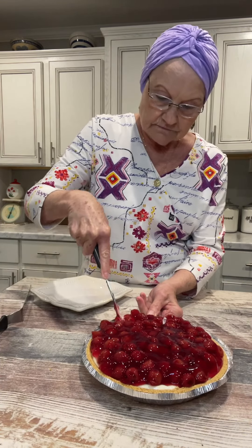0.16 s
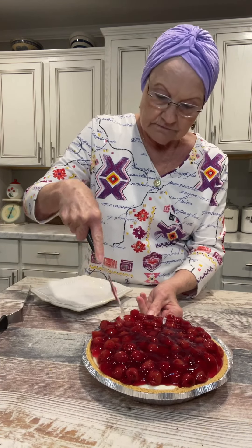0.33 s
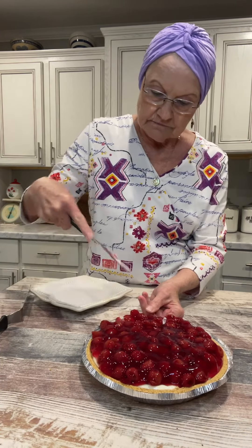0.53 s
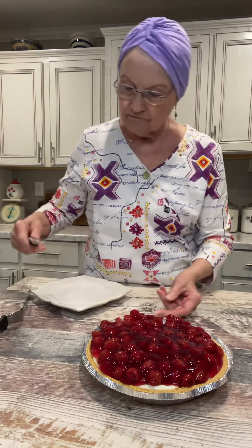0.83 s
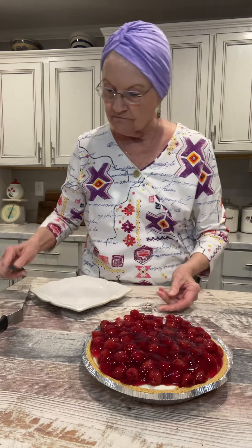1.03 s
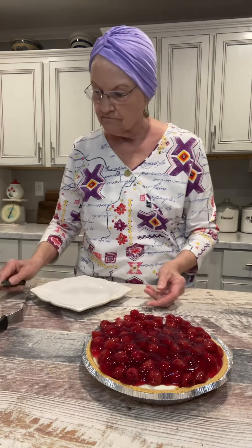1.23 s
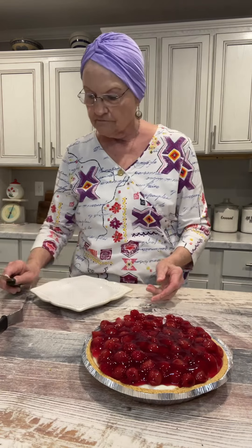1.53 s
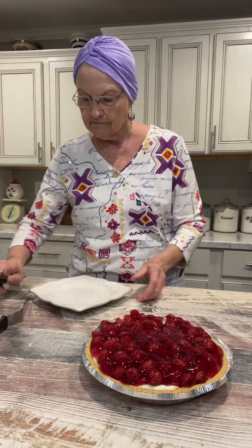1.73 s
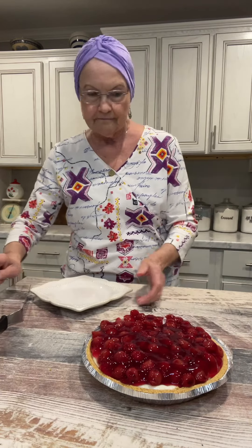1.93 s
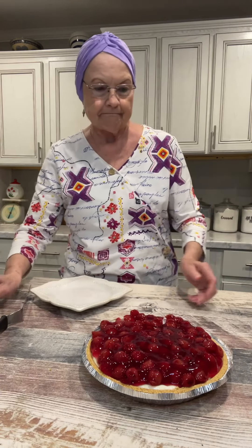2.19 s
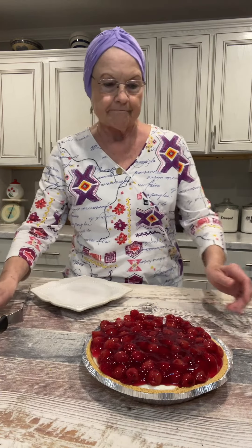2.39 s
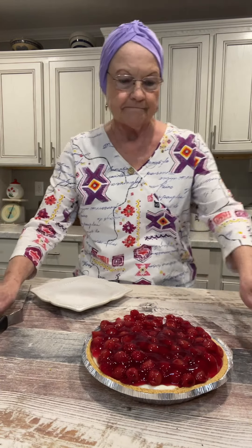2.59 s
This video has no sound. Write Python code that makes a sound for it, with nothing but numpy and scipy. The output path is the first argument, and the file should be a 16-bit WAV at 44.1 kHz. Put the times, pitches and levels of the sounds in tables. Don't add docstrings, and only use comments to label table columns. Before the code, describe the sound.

Dish dragged and set down hard on a worktop, preceded by small metallic knife taps

```python
import sys
import numpy as np
from scipy import signal
from scipy.fft import rfft, irfft
from scipy.io import wavfile
from scipy.ndimage import uniform_filter1d

SR = 44100
rng = np.random.default_rng(int(sys.argv[2]) if len(sys.argv) > 2 else 0)


def makeup_ratio(level_db):
    decades = np.asarray(level_db, float) / 20
    return 10 ** decades


def bounce(signal):
    frames = np.transpose(np.atleast_2d(signal))
    limited = np.clip(frames, -1, 1)
    pcm = np.round(limited * 32767).astype(np.int16)
    wavfile.write(sys.argv[1], SR, pcm)


N = 121275
T = np.arange(N) / SR


def table(rows, at, log=False):
    r = np.array(rows, float)
    if log:
        return np.interp(np.log(at), np.log(r[:, 0]), r[:, 1])
    return np.interp(at, r[:, 0], r[:, 1], -130, -130)


def unit(x):
    return x / np.sqrt(np.mean(x ** 2))


def colour(x, tone):
    hz = np.maximum(np.arange(4097) * SR / 8192, 1)
    cep = irfft(np.log(makeup_ratio(table(tone, hz, log=True))))
    cep[1:4096] *= 2
    cep[4097:] = 0
    return signal.fftconvolve(x, irfft(np.exp(rfft(cep))))[:len(x)]


def ring(x, hz, t60_s):
    pole = np.exp(2j * np.pi * hz / SR - np.log(1000) / (max(t60_s, .002) * SR))
    return signal.lfilter([1], [1, -pole], x).imag


def ping(at_s, hz, t60_s):
    return ring(1. * (np.arange(N) == int(at_s * SR)), hz, t60_s)


def walk(rate_hz):
    k = int(SR / rate_hz)
    return unit(uniform_filter1d(uniform_filter1d(rng.standard_normal(N), k), k))


def grit(rate_hz, scatter_db):
    chance, sign, size = rng.random((3, N))
    slips = (chance < rate_hz / SR) * np.sign(sign - .5)
    return unit(slips * makeup_ratio(-scatter_db * np.log(size + .02)))


def hits(rows, modes, crack, crack_db, crack_s, split=.02):
    out, t = np.zeros(N), T[:SR // 4]
    impulse = 1. * (t == 0)
    for s, db, top_hz in rows:
        snap = colour(rng.standard_normal(len(t)) * np.exp(-t / crack_s), crack)
        body = np.zeros(len(t))
        for k, (hz, gain_db, t60_s) in enumerate(modes):
            level, detune = rng.standard_normal(2)
            if hz >= 300:
                t60_s = min(t60_s, .07)
            for side in (-1, 1):
                mode = ring(impulse, hz * (1 + side * split * detune), t60_s)
                body += (-1) ** k * makeup_ratio(gain_db + 2 * level) * mode
        hit = body / abs(body).max() + makeup_ratio(crack_db) * snap / abs(snap).max()
        soft = signal.butter(2, min(top_hz, SR / 2.2), fs=SR, output="sos")
        hit = signal.sosfilt(soft, hit)
        i = int(s * SR)
        out[i:i + len(t)] += makeup_ratio(db) * hit[:N - i]
    return out


def bend(x, delay_1khz_s):
    khz = np.fft.rfftfreq(N, 1000 / SR)
    phase = 4 * np.pi * 1000 * delay_1khz_s * (np.sqrt(khz + .02) - khz / 8)
    return irfft(rfft(x) * np.exp(-1j * phase), N)


# (frequency [Hz], t60 [s])
ROOM_T60 = [(100, 0.57), (400, 0.33), (1500, 0.47), (4000, 0.4), (8000, 0.32), (15000, 0.31)]


def room(x, wet_db):
    t, tail = T[:SR // 2], 0
    for hz in 60 * 2 ** np.arange(0, 8.2, .5):
        edges_hz = [hz / 2 ** .25, hz * 2 ** .25]
        sos = signal.butter(2, edges_hz, "band", fs=SR, output="sos")
        band = signal.sosfilt(sos, rng.standard_normal(len(t)))
        tail = tail + band * makeup_ratio(-60 * t / table(ROOM_T60, hz, log=True))
    build_up_s = 0.001
    tail = tail * (1 - np.exp(-t / build_up_s))
    return x + makeup_ratio(wet_db) * signal.fftconvolve(x, tail / np.sqrt(np.sum(tail ** 2)))[:N]


# (frequency [Hz], level [dB])
KITCHEN_TONE = [(15, -19), (25, -10), (64, 0), (236, -9.5), (354, -6), (384, -20), (416, -10), (1400, -28),
                (16000, -38.5)]
# (frequency [Hz], level [dB])
FRIDGE_LINES = [(59.5, -60), (119, -89), (178, -76), (416, -73), (712, -80), (1122, -79)]
# (time [s], level [dB])
WHINE = [(0, -62), (.15, -62), (1.1, -63), (1.3, -74.5), (1.9, -64), (2.75, -87)]


def fridge():
    kitchen_db, whine_hz = -58, 354
    hiss = unit(colour(rng.standard_normal(N), KITCHEN_TONE))
    out = hiss * makeup_ratio(kitchen_db - 2.0 + 2.9 * walk(9.4))
    for hz, db in list(FRIDGE_LINES) + [(whine_hz, table(WHINE, T))]:
        cycles = hz * T + rng.random() + 0.039 * walk(1.2)
        out += makeup_ratio(db + 1.5 + 3.0 * walk(4.0)) * np.sin(2 * np.pi * cycles)
    return out


# (time [s], level [dB])
RUSTLE = [(0, -73.5), (.04, -64.5), (.13, -65), (.25, -73.5), (.4, -71.5), (.425, -65.5), (.56, -63.5),
          (.65, -71), (.85, -65), (.98, -67.5), (1.4, -74), (1.63, -71), (1.66, -67.5), (1.8, -70.5),
          (2.0, -73), (2.66, -67.5), (2.7, -65.5), (2.75, -59)]
# (frequency [Hz], level [dB])
RUSTLE_TONE = [(300, -12.5), (700, -2), (1500, -3.5), (3300, -7), (6000, -12.5), (15000, -21)]


def rustle():
    return unit(colour(grit(6000, 2.5), RUSTLE_TONE)) * makeup_ratio(table(RUSTLE, T) + walk(30))


# (time [s], level [dB], frequency [Hz], t60 [s])
THUMPS = [
    (1.018, -45.5, 150, 0.067),
    (1.076, -60, 150, 0.28),
    (1.129, -66, 145, 0.075),
    (1.569, -49, 95, 0.11),
    (1.665, -55, 480, 0.068),
    (1.7, -50, 300, 0.09),
    (1.721, -61, 1160, .05),
]


def wrist_thumps():
    return sum(makeup_ratio(db) * ping(s, hz, t60_s) for s, db, hz, t60_s in THUMPS)


# (time [s], peak [dB], centre [Hz])
TICKS = [
    (0.064, -43.5, 9900),
    (0.0646, -50, 5000),
    (0.162, -49, 13100),
    (0.166, -42, 12800),
    (.170, -44, 14000),
    (0.174, -51, 11800),
    (0.2254, -48, 5500),
    (.311, -62, 12000),
    (1.814, -51, 13100),
]


def sticky_ticks():
    return sum(makeup_ratio(db) * ping(s, hz, 3 / hz) for s, db, hz in TICKS)


# (time [s], peak [dB], brightest [Hz])
RIM_TAPS = [
    (.4234, -48.5, 3500),
    (.4446, -34.5, 15500),
    (.4456, -29.5, 11000),
    (.4525, -40.5, 6900),
    (.47, -55, 3900),
    (.53, -45.5, 6400),
]
# (frequency [Hz], level [dB], t60 [s])
PAN = [(1830, -8, .03), (2190, -4, 0.046), (2440, -2.5, 0.025), (3244, -3.5, 0.058), (3370, -8, 0.033),
       (6310, -9.5, 0.041), (7040, -2, 0.025), (8840, -17, 0.018)]
# (frequency [Hz], level [dB])
RIM_CRACK = [(500, -30), (1100, -7), (2240, -9), (3300, -4), (5100, -4), (7100, -6), (10000, -5.5),
             (14500, -7.5)]


def rim_clinks():
    return hits(RIM_TAPS, PAN, RIM_CRACK, crack_db=3.5, crack_s=0.0011, split=.04)


# (time [s], level [dB])
SLIDE = [(.985, -64), (1.005, -62), (1.022, -50), (1.1, -62.5), (1.13, -51), (1.19, -57.5), (1.215, -48.5),
         (1.26, -66), (1.34, -78)]
# (frequency [Hz], level [dB])
SLIDE_TONE = [(500, -39), (1000, 1), (2100, 0), (4000, -7.5), (10000, -15.5), (11500, -18), (16000, -24)]


def knife_slide():
    return unit(colour(grit(3000, 3), SLIDE_TONE)) * makeup_ratio(table(SLIDE, T) + walk(40))


# (time [s], peak [dB], brightest [Hz])
LAY_TAPS = [
    (1.0068, -44, 2100),
    (1.0211, -42, 22000),
    (1.1265, -44, 17000),
    (1.1318, -29.5, 13000),
    (1.1365, -28.5, 17000),
    (1.143, -29.5, 28000),
    (1.15, -40, 20000),
    (1.1605, -31, 2500),
    (1.177, -38.5, 15000),
    (1.2094, -36, 2500),
]
# (frequency [Hz], level [dB], t60 [s])
BLADE = [(1250, -4, 0.047), (2077, 9, 0.035), (2980, -3, 0.036), (4780, 0, 0.06), (5820, 7, 0.045),
         (7100, 2, 0.063), (8110, 2.5, 0.07), (9450, 1.5, 0.07), (10750, 1.5, 0.07), (12500, -9, .07),
         (13000, -4, 0.032), (14500, -1, .05)]
# (frequency [Hz], level [dB])
LAY_CRACK = [(600, -62), (1200, 3.5), (2100, -12), (3500, 4), (5840, 1), (10500, -4.5), (12500, -12),
             (16000, -12)]


def knife_laid():
    return hits(LAY_TAPS, BLADE, LAY_CRACK, crack_db=-5, crack_s=.004, split=.009)


# (time [s], peak [dB], brightest [Hz])
KNOCK = [
    (2.0659, -7, 5500),
    (2.0702, -13, 4000),
    (2.0742, -24, 3500),
    (2.0802, -21, 3500),
    (2.0845, -18, 2500),
    (2.366, -34, 5000),
]
# (frequency [Hz], level [dB], t60 [s])
DISH = [(186, -12.5, 0.038), (297, -6.5, 0.041), (540, 1, 0.022), (738, -18.5, 0.047), (989, -12.5, 0.039),
        (1287, -6, 0.014), (1410, -22, 0.03), (2090, -3.5, 0.015), (2970, -13, 0.018)]
# (frequency [Hz], level [dB])
KNOCK_CRACK = [(60, -44), (150, -24), (480, -7), (1400, 0), (2200, -6), (3400, -20), (8500, -34),
               (16000, -46)]


def dish_knock():
    return bend(hits(KNOCK, DISH, KNOCK_CRACK, crack_db=4, crack_s=.00004), delay_1khz_s=.0016)


def sing(slips, peaks):
    out = 0
    for k, (hz, width_hz, db) in enumerate(peaks):
        mode = unit(ring(slips, hz, 2.2 / max(width_hz, 110)))
        out = out + (-1) ** k * makeup_ratio(db) * mode * np.sqrt(width_hz)
    return unit(out)


# (time [s], level [dB])
DRAG = [(2.075, -46), (2.095, -35), (2.14, -35), (2.165, -32), (2.2, -29.5), (2.27, -33), (2.31, -38),
        (2.39, -47), (2.45, -58)]
# (frequency [Hz], width [Hz], level [dB])
DRAG_RING = [(275, 49, -16), (480, 120, -3.5), (640, 185, -1.5), (740, 34, -25), (990, 26, 1),
             (1260, 77, 4.5), (1660, 30, 0.5), (2130, 74, -18), (2656, 92, -7.5), (3010, 660, -18.5)]
# (frequency [Hz], level [dB])
DRAG_TONE = [(60, -38), (140, -19), (300, -6), (563, -0.5), (896, -10.5), (2040, -11.5), (3200, -25),
             (16000, -62.5)]
# (frequency [Hz], width [Hz], level [dB])
TILTED_RING = [(190, 44, -5), (290, 170, -6), (535, 290, -8.5), (746, 61, 1.5), (1100, 45, -1.5),
               (1750, 41, -22), (2170, 410, -14.5)]
# (time [s], extra level [dB])
JOLTS = [(2.107, -0.5), (2.118, 4.5), (2.137, -1.5), (2.16, 4), (2.187, -2.5), (2.201, 2.5), (2.227, -0.5),
         (2.255, 5.5), (2.283, 3.5), (2.311, 2), (2.344, 5), (2.395, 4.5)]


def dish_drag():
    tilts_at_s, tilting_s, jolt_s = 2.28, 0.0081, 0.0066
    slips = grit(2500, 2.5) * makeup_ratio(2.2 * walk(70))
    tilt = .5 + .5 * np.tanh((T - tilts_at_s) / tilting_s)
    flat_sound = unit(colour(slips, DRAG_TONE)) + makeup_ratio(-2) * sing(slips, DRAG_RING)
    tilted_sound = makeup_ratio(0.5) * sing(slips, TILTED_RING)
    catch_db = sum(db * np.exp(-((T - s) / jolt_s) ** 2) for s, db in JOLTS)
    level = makeup_ratio(table(DRAG, T) - 1.5 + catch_db)
    return level * ((1 - tilt) * flat_sound + tilt * tilted_sound)


# (time [s], peak [dB], brightest [Hz])
DROP = [(2.4554, -13, 15000), (2.4592, -12, 15000), (2.4635, -28.5, 8000), (2.4695, -16, 8100),
        (2.4725, -19, 6060), (2.4795, -23.5, 5100), (2.4865, -25.5, 5000), (2.4945, -24, 2500),
        (2.4985, -18.5, 2500), (2.511, -30, 2530), (2.538, -31.5, 2500)]
# (frequency [Hz], level [dB], t60 [s])
WORKTOP = [(63.4, -26.5, 0.22), (150, -13.5, 0.12), (412, -6, 0.032), (599, -1, 0.028), (788, -1.5, 0.04),
           (1050, -4.5, 0.015), (1273, -6, 0.036), (1593, -13.5, 0.035), (2053, -1, 0.044),
           (2260, -12.5, 0.024), (7270, -3.5, 0.0018)]
# (frequency [Hz], level [dB])
DROP_CRACK = [(50, -48), (150, 0), (750, -1.5), (2300, -1.5), (3600, -12.5), (4900, -13), (7500, -30.5),
              (16000, -45)]


def dish_drop():
    return bend(hits(DROP, WORKTOP, DROP_CRACK, crack_db=4.5, crack_s=0.0035), delay_1khz_s=.001)


def scene():
    pie = room(sticky_ticks() + wrist_thumps(), wet_db=-5.5)
    knife = room(rim_clinks() + knife_laid() + knife_slide() + rustle(), wet_db=-5.0)
    dish = room(dish_knock() + dish_drag() + dish_drop(), wet_db=-6.5)
    return (fridge() + pie + knife + dish)[None]


def low_pass(x):
    return signal.sosfilt(signal.butter(12, 16000, fs=SR, output="sos"), x)


def record(dry):
    headroom, low_hz, top_hz = 1.1, 45, 15900
    mix = headroom * np.tanh(dry / headroom)
    mix = signal.sosfilt(signal.butter(2, low_hz, "high", fs=SR, output="sos"), mix)
    mix = signal.sosfilt(signal.ellip(8, .2, 60, top_hz, fs=SR, output="sos"), mix)
    return low_pass(mix)


dry = scene()
out = record(dry)
bounce(out)
```